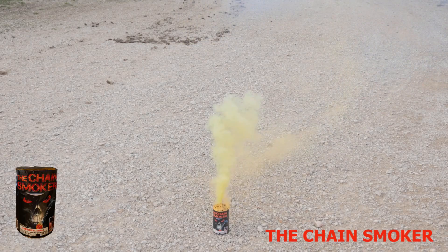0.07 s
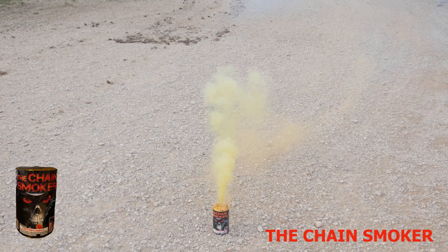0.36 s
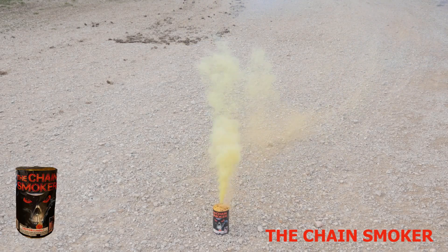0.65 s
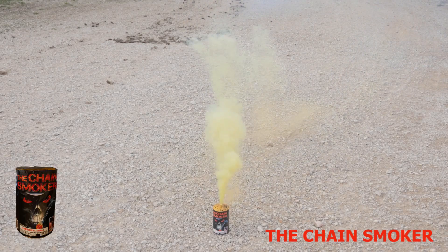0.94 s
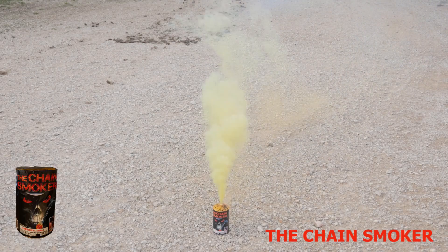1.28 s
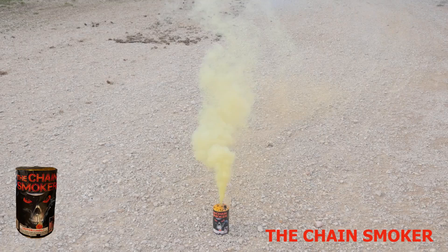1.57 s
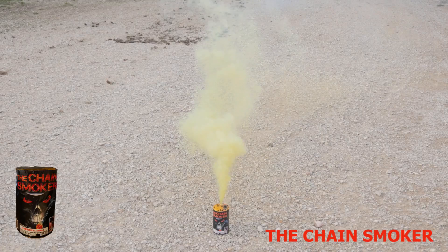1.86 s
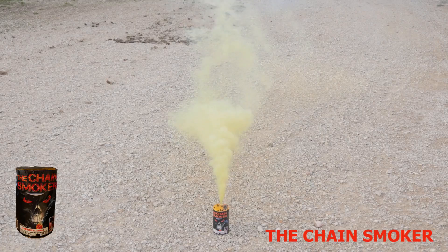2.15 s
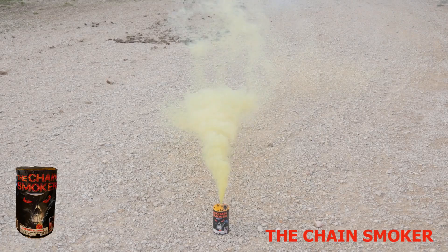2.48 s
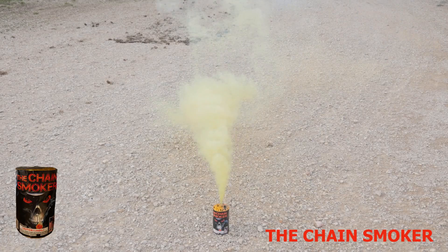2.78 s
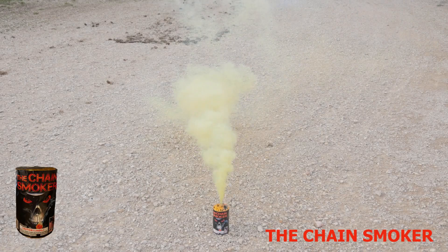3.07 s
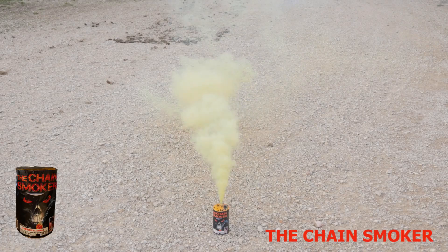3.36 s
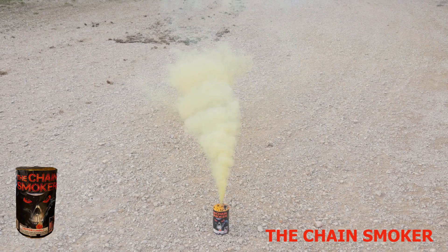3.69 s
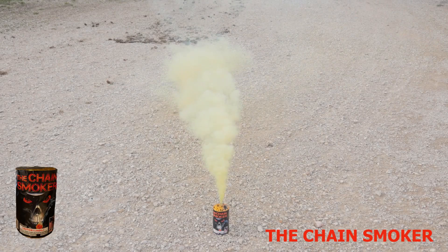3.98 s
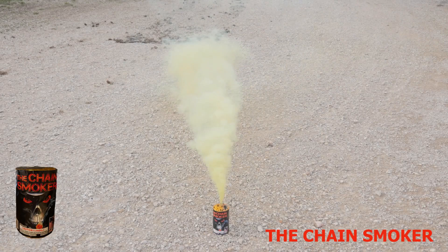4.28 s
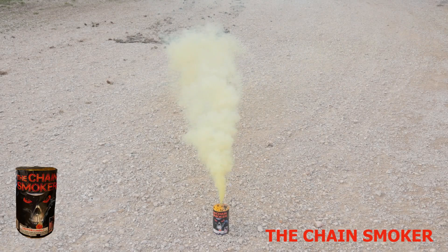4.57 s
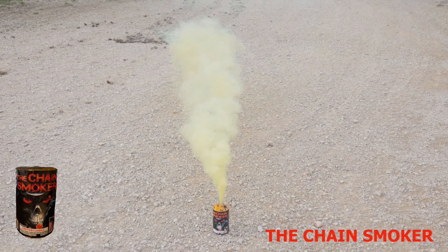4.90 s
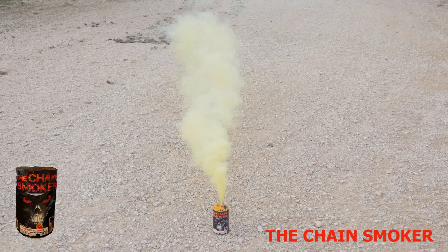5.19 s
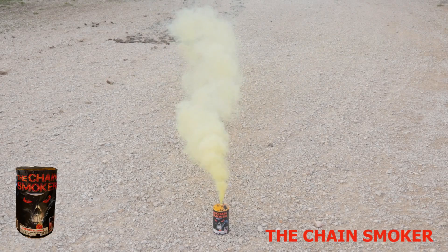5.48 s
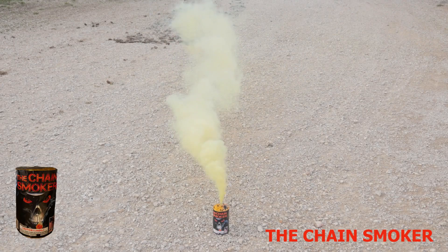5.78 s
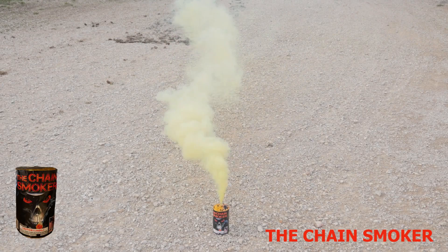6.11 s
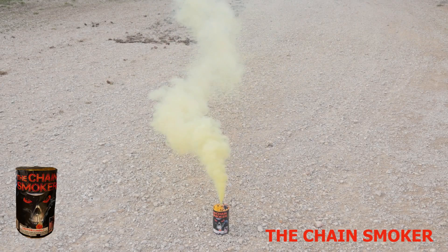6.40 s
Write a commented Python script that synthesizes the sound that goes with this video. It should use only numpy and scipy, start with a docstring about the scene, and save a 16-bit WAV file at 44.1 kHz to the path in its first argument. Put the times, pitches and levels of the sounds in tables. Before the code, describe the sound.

Steady, high hiss of gas jetting from a smoke firework, wavering slightly, over gusts of low wind rumble.

```python
"""Smoke firework on open gravel

A smoke firework vents a steady jet of gas. The jet hisses through the vent's resonances,
brighter when the charge burns harder, and flutters as it burns unevenly. Gusts rumble on the
microphone over a faint outdoor wash; a soft mid-range rush ebbs early and rises near the end."""
import sys
import numpy as np
from scipy import signal
from scipy.fft import rfft, irfft
from scipy.io import wavfile
from scipy.ndimage import uniform_filter1d

SR = 44100
rng = np.random.default_rng(int(sys.argv[2]) if len(sys.argv) > 2 else 0)


def file_out(sig):
    """Save sig as 16-bit WAV at sys.argv[1]."""
    # one column per channel
    cols = np.atleast_2d(sig).T
    # limit, then scale
    lim = np.clip(cols, -1, 1)
    pcm = np.round(lim * 32767).astype(np.int16)
    wavfile.write(sys.argv[1], SR, pcm)


N = 284445
TIME = np.arange(N) / SR
BINS = np.fft.rfftfreq(N, 1 / SR)


def gain_of(db):
    """Decibels to amplitude."""
    return 10 ** (np.asarray(db) / 20)


def curve_at(points, hz):
    """An EQ curve of rows (freq_hz, value), joined by straight lines on a log-frequency axis."""
    freqs, values = np.transpose(points)
    return np.interp(np.log(hz + 1), np.log(freqs + 1), values)


def envelope_at(rows, t):
    """An envelope of rows (time_s, value) at the times t."""
    return np.interp(t, *np.transpose(rows))


def unit_rms(x):
    """Scales to an rms of 1."""
    return x / np.sqrt(np.mean(x ** 2) + 1e-20)


def noise(eq):
    """Steady noise of rms 1, coloured by an EQ curve."""
    white = rfft(rng.standard_normal(N))
    return unit_rms(irfft(white * gain_of(curve_at(eq, BINS)), N))


def steadied(x, seconds):
    """Evens out the slow chance swells of a noise."""
    power = uniform_filter1d(x ** 2, max(int(seconds * SR), 1))
    return x / np.sqrt(uniform_filter1d(power, size=1500) + 1e-9)


def stereo(mid, side):
    """Left and right from mid and side."""
    return np.array([mid + side, mid - side])


def drift(shape, frames, bins):
    """Random modulation of rms 1, smooth over so many frames and bins."""
    field = uniform_filter1d(rng.standard_normal(shape), max(int(frames), 1), axis=1)
    return unit_rms(uniform_filter1d(field, max(int(bins), 1), axis=0))


def swells(rows):
    """Swells that grow and die exponentially and add in power: one envelope for each level column."""
    power = 0
    for peak_s, rise_s, fall_s, *levels_db in rows:
        shape = np.exp(-abs(TIME - peak_s) / np.where(TIME < peak_s, rise_s, fall_s))
        power = power + np.outer(gain_of(levels_db), shape) ** 2
    return np.sqrt(power)


def open_air(wash_db=-74, side_db=-13):
    """A faint, even bed of outdoor air, and a soft rush with a hollow tone that swells within it."""
    # colours of the bed, the rush and its hollow tone: freq_hz, gain_db
    wash_eq = [(60, -44), (200, 0.5), (370, 1.5), (500, 4), (700, -2), (1000, -0.5), (2000, -33),
               (5000, -15.5), (15000, -14.5)]
    rush_eq = [(200, -36), (600, -5.5), (800, -3.5), (1000, -2), (1330, 2.5), (1800, -53), (4000, -29)]
    hollow_eq = [(400, -40), (700, -4), (790, 6), (880, 1), (960, 9), (1040, 6), (1130, -8), (2000, -40)]
    # swells of the rush: peak_s, rise_s, fall_s, rush_db, hollow_db
    rushes = [(0.05, 0.3, 1.3, -69.5, -92), (5.93, 0.24, 0.15, -73, -77), (6.42, 0.43, 0.4, -71, -66)]
    rush_gain, hollow_gain = swells(rushes)
    mid, side = (gain_of(wash_db) * noise(wash_eq) + rush_gain * noise(rush_eq) for _ in range(2))
    return stereo(mid + hollow_gain * noise(hollow_eq), gain_of(side_db) * side)


def wind(breeze_db=-55.5, breeze_swirl_db=-70, tear_db=-11, tear_growth=1.3, lumpy_db=1.75, lump_s=0.06):
    """Breeze and gusts buffet the microphone, in mono; strong gusts shed smaller eddies."""
    # gusts: peak_s, rise_s, fall_s, large_eddies_db, small_eddies_db
    gusts = [(0.06, 0.12, 0.13, -40, -49.5), (0.19, 0.079, 0.23, -37.5, -52),
             (0.54, 0.046, 0.017, -40.5, -72), (0.76, 0.062, 0.22, -47, -66),
             (2.48, 0.041, 0.025, -48, -80.5), (5.09, 0.066, 0.092, -43, -61),
             (5.48, 0.73, 0.77, -43, -70.5), (5.9, 0.27, 0.29, -63, -61.5)]
    # colours of large eddies, small eddies and the flutter a strong gust tears loose: freq_hz, gain_db
    buffet_eq = [(15, -42), (30, -24), (40, -14), (50, -5), (62, 1), (78, -3), (100, -8), (125, -15),
                 (170, -30), (300, -60), (1000, -100)]
    eddy_eq = [(40, -13), (90, -21.5), (130, 5.5), (160, -1.5), (200, -7.5), (270, -11), (330, -21),
               (450, -25.5), (800, -39), (3000, -83)]
    tear_eq = [(100, -9), (200, 1.5), (280, -0.5), (380, -2.5), (480, -15), (700, -27), (2000, -52)]
    push, swirl = swells(gusts)
    swirl = np.hypot(swirl, gain_of(breeze_swirl_db))
    lumps = gain_of(lumpy_db * drift((1, N), frames=lump_s * SR, bins=1)[0])
    breeze_eq = [(hz * 0.89, db) for hz, db in buffet_eq]  # slower air rumbles lower
    breeze = steadied(noise(breeze_eq), seconds=0.2) * gain_of(breeze_db)
    large_eddies = steadied(noise(buffet_eq), seconds=0.051) * push
    small_eddies = steadied(noise(eddy_eq), seconds=0.1) * swirl
    torn_air = noise(tear_eq) * swirl * gain_of(tear_db) * (swirl / swirl.max()) ** tear_growth
    return lumps * (breeze + large_eddies) + small_eddies + torn_air


def burn(t, spurt_half_s=0.042):
    """How hard the charge burns, in dB: a slow course with brief spurts."""
    # course of the burn, as the level of the open jet: time_s, level_db
    course = [(0.0, -52.5), (0.11, -56.5), (0.25, -53.5), (1.35, -51), (1.38, -50), (3.47, -53),
              (3.93, -52), (4.09, -54.5), (5.57, -55.5), (5.6, -57.5), (5.73, -52.5), (5.8, -57),
              (5.96, -51), (6.45, -53.5)]
    # the charge briefly flares (+) or chokes (-): peak_s, change_db
    spurts = [(0.5, 1), (0.79, -0.5), (1.3, -1.5), (1.41, 2.6), (1.631, 1.5), (1.87, 1.5), (2.05, 3),
              (2.35, -0.5), (2.45, 2), (3.28, -1.5), (3.4, 1.4), (3.8, 1)]
    spurts_db = sum(db * np.exp(-((t - peak_s) / spurt_half_s) ** 2) for peak_s, db in spurts)
    return envelope_at(course, t) + spurts_db


def jet_hiss(trim_db=-0.37, brighten=0.18, flutter_db=0.54, patchy_db=0.89, crossover_hz=4700):
    """Turbulent gas hisses out of the vent; a harder burn is louder and brighter."""
    # colour of the jet's turbulence: freq_hz, gain_db
    jet_eq = [(300, -16), (800, -17), (1150, -13.5), (1550, -7.5), (2000, -10.5), (2500, -11.5),
              (2800, -14.5), (3020, -10), (3300, -5), (5300, -1), (7700, -2.5), (9300, -6.5), (12000, -9),
              (14300, -15), (15700, -17)]
    # peaks and dips in the colour of the hiss: centre_hz, width_hz, gain_db
    peaks_and_dips = [(2730, 230, -3.5), (3680, 670, 7.5), (4500, 200, 4), (4630, 280, -3.5),
                      (5150, 200, 2), (5800, 270, 3), (6720, 610, -1.5), (7550, 390, 0.9), (9840, 300, 2),
                      (11760, 640, 2.1), (13100, 560, -0.5), (14100, 930, 4.5)]
    # the vent's low ring at an average burn: time_s, level_db
    ring = [(0.2, -55.5), (1.1, -58.5), (4.7, -56), (6.1, -55.5)]
    # stereo width of the hiss: freq_hz, side_minus_mid_db
    stereo_width = [(500, -22.5), (1400, -30), (2600, -52.5), (4000, -29), (7000, -18), (11000, -15),
                    (15000, -13)]
    hz, t, white = signal.stft(rng.standard_normal((2, N)), SR, nperseg=512, noverlap=384)
    contour_db = sum(db / (1 + (2 * (hz - centre) / width) ** 2) for centre, width, db in peaks_and_dips)
    colour = gain_of(curve_at(jet_eq, hz) + contour_db)[:, None]

    def band_db(low_hz, high_hz):
        """Level that the colour alone gives a band."""
        return 10 * np.log10(np.sum(colour[(hz > low_hz) & (hz < high_hz)] ** 2) / len(hz))

    burn_db = burn(t)
    surge_db = burn_db - burn_db.mean()
    # the finest eddies follow the gas speed most strongly
    octaves = np.log2(np.maximum(hz, 4000) / 7000)[:, None]
    fizz_db = burn_db - band_db(4500, 15000) + trim_db + brighten * octaves * surge_db
    # the low resonances take up only part of each change in the burn
    body_db = envelope_at(ring, t) - band_db(3000, 4400) + 0.62 * surge_db
    body_share = curve_at([(1800, 0.38), (3000, 1.0)], hz) / (1 + (hz / crossover_hz) ** 10)
    body_share = body_share[:, None]
    level_db = body_share * body_db + (1 - body_share) * fizz_db
    # uneven burning: a flutter of the whole jet and brief patches of colour
    level_db += flutter_db * drift((1, len(t)), frames=23, bins=1)
    level_db += patchy_db * drift(level_db.shape, frames=9.9, bins=10)
    spectra = white * colour * gain_of(level_db)
    spectra[1] *= gain_of(curve_at(stereo_width, hz))[:, None]
    mid, side = signal.istft(spectra, SR, nperseg=512, noverlap=384)[1][:, :N]
    return stereo(mid, side)


def scene():
    """The firework straight ahead, in wind and open air."""
    return jet_hiss() + wind() + open_air()


def record(dry, low_cut_hz=40, high_cut_hz=15720):
    """A low cut tames the wind rumble; a steep high cut trims the top of the hiss."""
    low_cut = signal.butter(4, low_cut_hz, "highpass", fs=SR, output="sos")
    high_cut = signal.firwin(1023, high_cut_hz, window=("kaiser", 9), fs=SR)
    return signal.oaconvolve(signal.sosfilt(low_cut, dry), high_cut[None], "same")


dry = scene()
out = record(dry)
file_out(out)
```